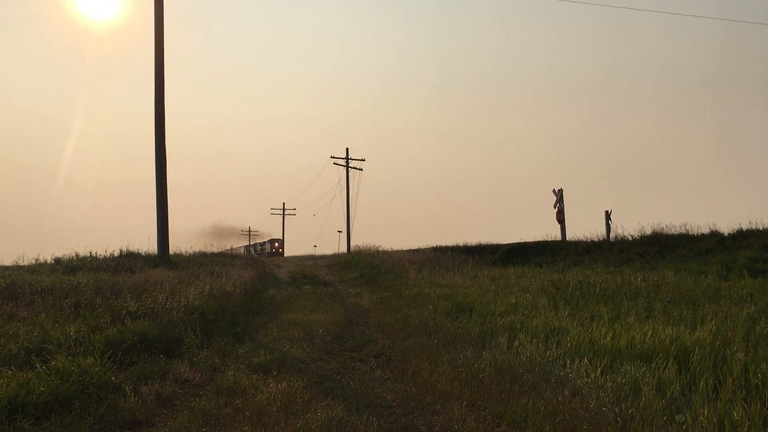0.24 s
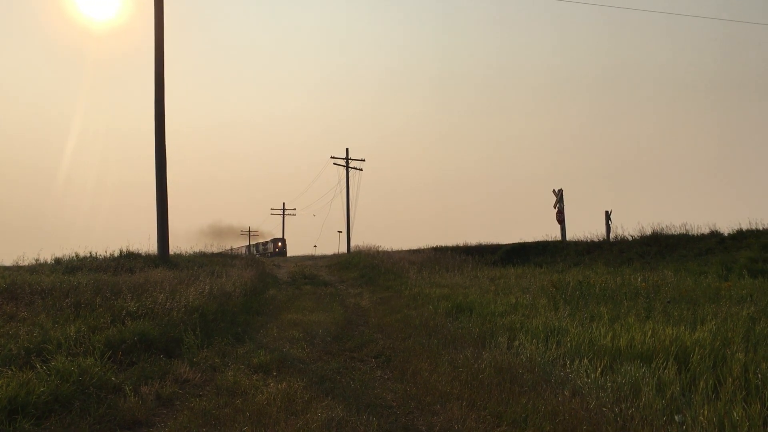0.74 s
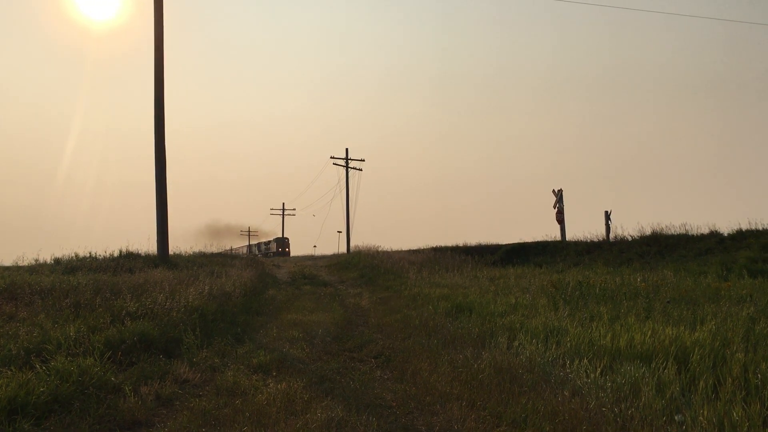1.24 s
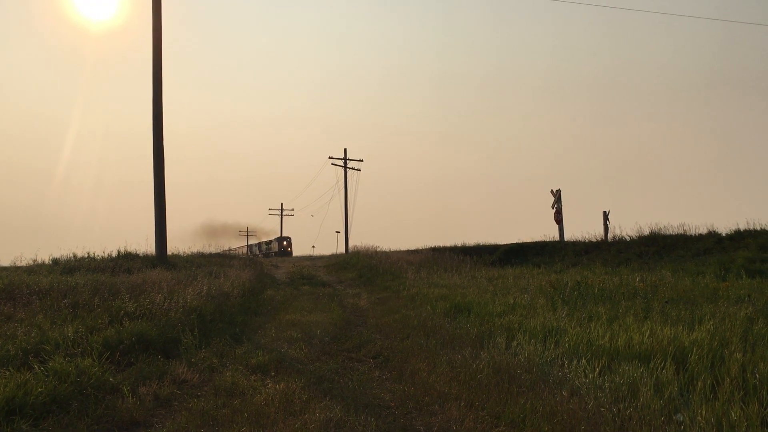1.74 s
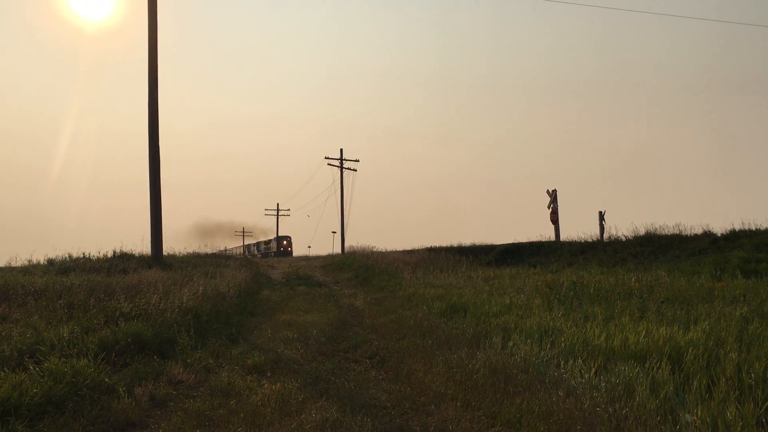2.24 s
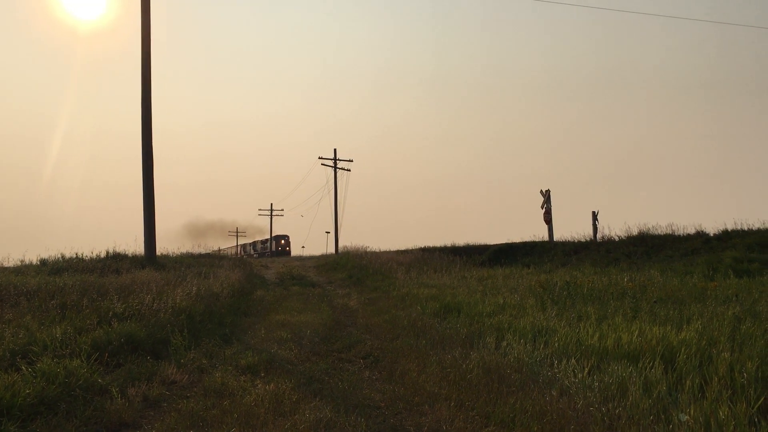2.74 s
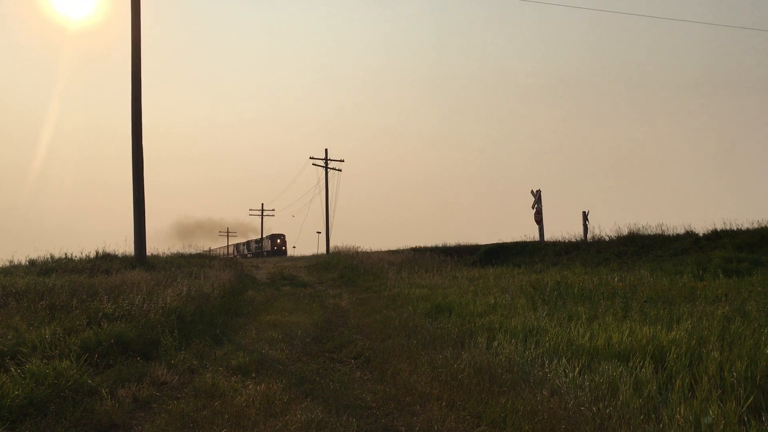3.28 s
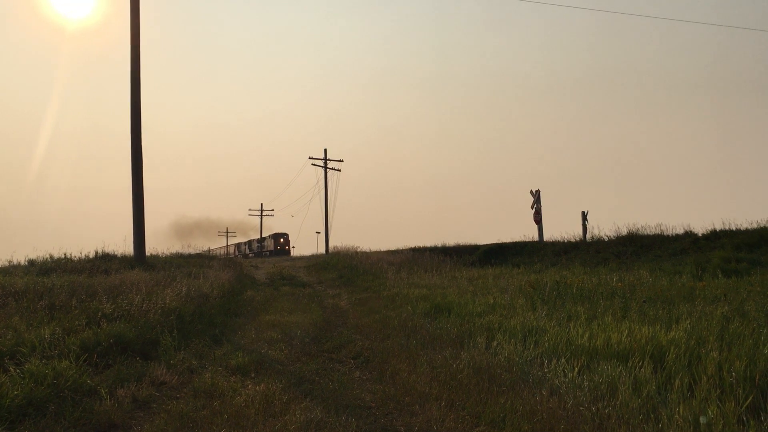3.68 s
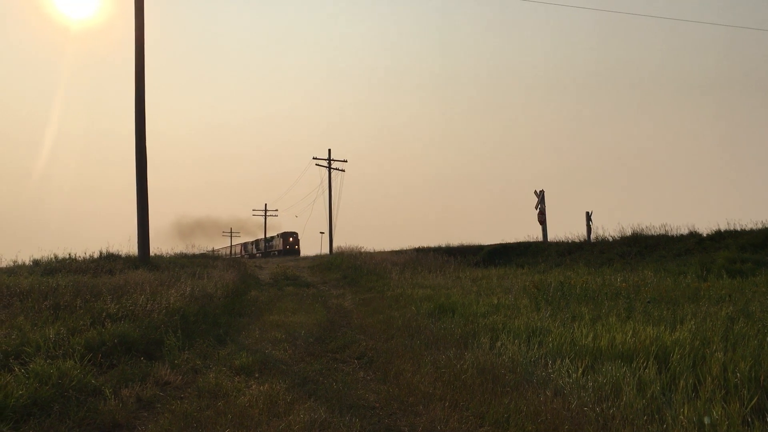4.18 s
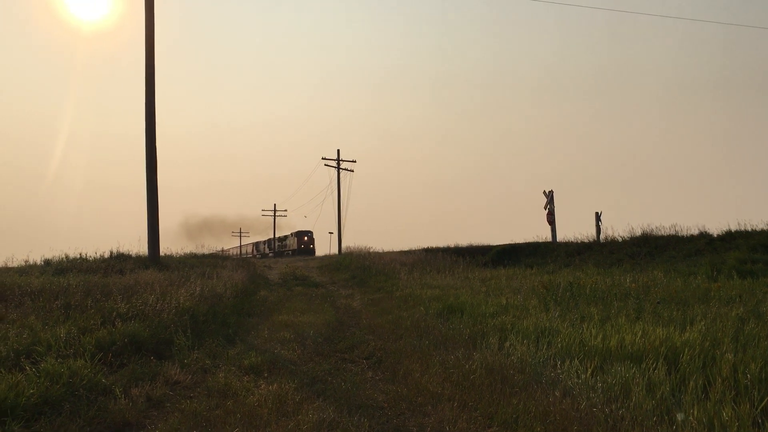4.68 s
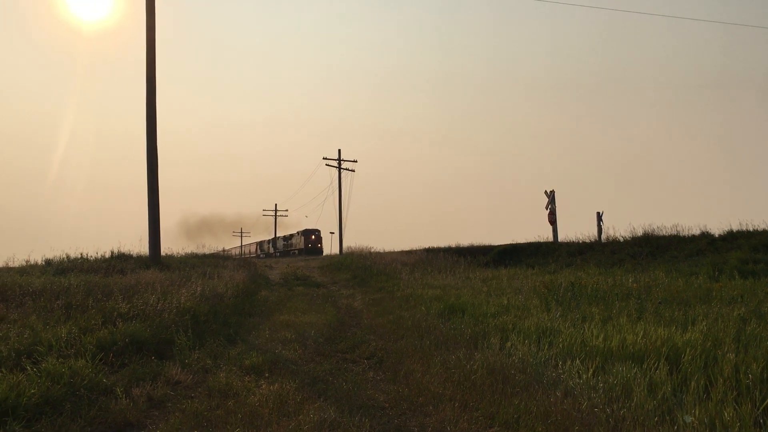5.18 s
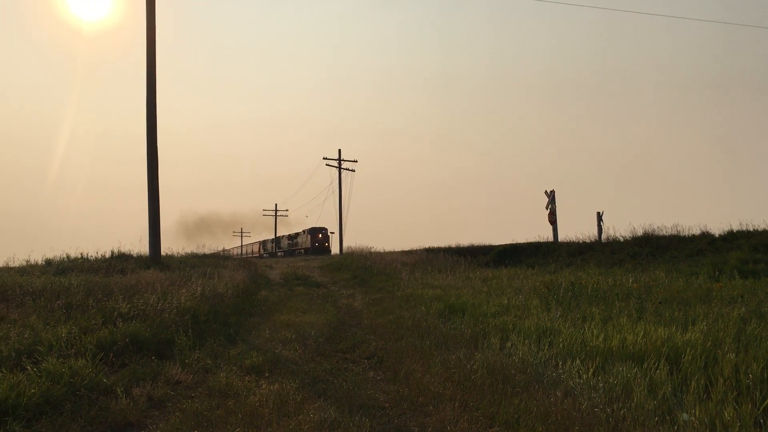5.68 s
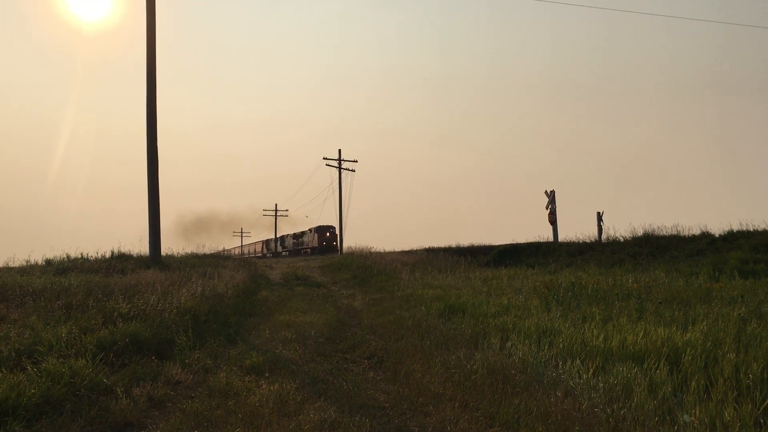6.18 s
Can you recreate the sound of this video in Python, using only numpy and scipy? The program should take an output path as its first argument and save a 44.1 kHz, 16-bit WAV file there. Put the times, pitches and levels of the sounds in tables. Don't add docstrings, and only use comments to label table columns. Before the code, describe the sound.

Low pulsing diesel engine and wheel rumble slowly grow over faint insect buzzing and a close tick, before one short chordal train horn blast fades away.

```python
import sys
import numpy as np
from scipy import signal
from scipy.fft import rfft, irfft
from scipy.io import wavfile
from scipy.ndimage import uniform_filter1d

SR = 44100
rng = np.random.default_rng(int(sys.argv[2]) if len(sys.argv) > 2 else 0)


def pcm_store(signal):
    levels = np.round(np.clip(np.atleast_2d(signal), -1, 1) * 32767)
    wavfile.write(sys.argv[1], SR, levels.astype(np.int16).T)


def voltage_ratio(decibels):
    exponent = np.asarray(decibels, float) / 20
    return 10 ** exponent


N = 283122

# start_s, cycles_per_s / start_s, nearness_db
CRANK_SPEED = [(0.0, 9.0099), (1.5, 9.0147), (3.0, 9.0058), (4.0, 9.0095), (5.0, 9.0385), (5.7, 9.0421),
               (6.42, 9.0165)]
NEARNESS = [(0, 1), (.7, 1.5), (1.4, 2), (2.0, 4.5), (2.7, 6), (3.5, 8), (4.2, 8), (5.0, 9.5), (5.7, 13),
            (6.42, 14.5)]


def train():
    turns, near_db = np.cumsum(in_time(CRANK_SPEED)) / SR, in_time(NEARNESS)
    return throb(turns, near_db) + rumble(turns, near_db) + clatter(turns, near_db) + hiss(turns, near_db)


# multiple of the crank cycle rate, level_db (rms)
EXHAUST_TONES = [(5, -51.8), (6, -52.7), (7, -53.3), (8, -38.6), (9, -46.5), (10, -53.9), (11, -38.5),
                 (12, -40.8), (13, -43.4), (14, -54.6), (15, -54.1), (16, -54.5), (17, -52.0), (18, -61.3),
                 (19, -54.1), (20, -52.8), (21, -57.9), (22, -53.9), (23, -54.5), (24, -58.8), (25, -56.7),
                 (26, -53.6), (27, -59.3), (28, -52.2), (29, -51.1), (30, -55.0), (31, -63.2), (33, -60.0),
                 (34, -52.6), (35, -61.6)]
# place in the cycle (0-1), strength_db
FIRINGS = [(0.021, -9.9), (0.075, -14.2), (0.119, -5.3), (0.199, -14.0), (0.258, -15.4), (0.34, -13.8),
           (0.421, -3.9), (0.496, -5.2), (0.513, -10.8), (0.585, -4.8), (0.609, -6.4), (0.652, -15.9),
           (0.772, -1.3), (0.818, -12.2), (0.85, -7.0), (0.999, -9.2)]


def throb(turns, near_db):
    out = 0
    place, strength_db = np.transpose(FIRINGS)
    gain_db, bright_db = -1.1 + 0.17 * near_db, -2.83 + 0.61 * near_db
    for k, db in EXHAUST_TONES:
        lines_up = np.angle(np.sum(voltage_ratio(strength_db) * np.exp(-2j * np.pi * k * place)))
        upper = np.clip((k - 12.0) / 24.2, 0, 1)
        unsteady_db = (1.0 + 1.26 * upper) * drift(1.93)
        level = voltage_ratio(db + gain_db + upper * bright_db + unsteady_db)
        wander = 0.15 * upper * drift(2.3)
        out = out - np.sqrt(2) * level * np.cos(2 * np.pi * round(k) * turns + lines_up + wander)
    return out


# pitch_hz, level_db (per Hz)
RUMBLE_SPECTRUM = [(30, -24), (42, -3), (60, -5), (100, -4), (150, -3), (220, -3), (300, -5), (350, -14),
                   (420, -24), (550, -50)]


def rumble(turns, near_db):
    level = voltage_ratio(-50 + 0.96 * near_db)
    return level * puffs(turns + 0.1, depth_db=2.08) * coloured(RUMBLE_SPECTRUM)


# pitch_hz, level_db (per Hz)
CLATTER_SPECTRUM = [(190, -41), (330, 0.5), (414, -3.5), (464, -11.5), (612, -7.5), (752, -20), (950, -21),
                    (1530, -19.5), (1800, -26), (2340, -18), (3960, -120)]


def clatter(turns, near_db):
    level = voltage_ratio(-61.5 + 0.98 * near_db)
    return level * puffs(turns + 0.358, depth_db=0.73) * coloured(CLATTER_SPECTRUM)


# pitch_hz, level_db (per Hz)
HISS_SPECTRUM = [(900, -21), (1200, -35), (1530, -5.5), (1750, -8.5), (2050, 1), (2350, -6), (2800, -4),
                 (3300, -2.5), (3620, 1), (3950, -3.5), (6500, -5), (8200, -14), (9800, -18.5),
                 (11500, -30), (14000, -54)]
# middle_s, half_length_s, level_db
HISS_SWELLS = [
    (0.27, .04, 4.5),
    (3.52, 0.34, 4),
    (2.94, 0.62, 2),
    (4.17, 0.2, 4),
    (5.15, 0.14, -8),
]


def hiss(turns, near_db):
    t = np.arange(N) / SR
    swells_db = sum(db * np.exp(-((t - s) / half) ** 2) for s, half, db in HISS_SWELLS)
    level = voltage_ratio(-68 + 1.075 * near_db + swells_db)
    return level * puffs(turns, depth_db=0.92) * coloured(HISS_SPECTRUM)


def puffs(turns, depth_db):
    beats = 4 * turns
    size = rng.uniform(0.1, 1.9, 300)[beats.astype(int)]
    sudden = uniform_filter1d(size * np.exp(-2.5 * (beats % 1)), size=150)
    swell = np.cos(2 * np.pi * (turns - 0.3))
    return voltage_ratio(depth_db * (swell + 3.9 * (sudden - 0.5049)))


OPEN_S, CLOSE_S = 4.322, 5.176
# pitch_hz, level_db (at valve close), late_s, drain_loss_db, pitch_sag (share)
BELLS = [
    (324.6, -28.2, 0.0011, 16.5, .013),
    (380, -36, 0.0076, 21, .0045),
    (493.6, -36, 0.023, 46, 0.0014),
]
# multiple of its pitch, level_db
LOW_PARTIALS = [(1, 0.0), (2, -3.6), (3, -15.0), (4, -19.6), (5, -22.5), (6, -25.4), (7, -27.0), (8, -32.4),
                (9, -30.5), (10, -36.4), (11, -36.5), (12, -40.1), (13, -40.1), (14, -40.2), (15, -43.4),
                (16, -45.7), (17, -44.8), (18, -46.3), (19, -48.8), (20, -46.8), (21, -46.9), (22, -53.7)]
MID_PARTIALS = [(1, 0.0), (2, -0.5), (3, -13.5), (4, -12.5), (5, -20.5), (6, -19.5), (7, -29.0), (8, -30.0),
                (9, -34.0), (10, -31.4), (11, -33.4), (12, -34.3), (13, -40.3), (14, -40.6), (15, -38.1),
                (16, -40.1), (17, -39.4), (18, -42.3)]
TOP_PARTIALS = [(1, 0.0), (2, -15.0), (3, -19.5), (4, -19.9), (5, -21.5), (6, -27.5), (7, -33.9),
                (8, -31.8), (9, -35.3), (10, -36.4), (11, -38.7), (12, -43.2)]
# pitch_hz, level_db (per Hz)
RUSH_SPECTRUM = [(700, -6), (1100, -1.5), (1500, 2.5), (2500, -4.5), (4000, -8), (6000, -13), (8000, -17.5),
                 (10000, -26.5), (13000, -46)]


def horn():
    tables = (LOW_PARTIALS, MID_PARTIALS, TOP_PARTIALS)
    chord = sum(bell(row, partials) for row, partials in zip(BELLS, tables))
    squared = chord ** 2
    chord = chord + 0.15 * (squared - uniform_filter1d(squared, size=400))
    rush = blown(-46.5, late_s=0, rise_s=0.082, drain_db=40) * coloured(RUSH_SPECTRUM)
    return chord + near_echoes(chord) + far_echo(chord) + rush


def bell(row, partials):
    pitch_hz, db, late_s, drain_db, sag = row
    out = np.zeros(N)
    blast = slice(round(4.25 * SR), round(5.7 * SR))
    t = np.arange(N)[blast] / SR
    since_s, closing_s = np.clip(t - OPEN_S, 0, None), np.clip(t - CLOSE_S + 0.08, 0, None)
    sharp = 0.017 * np.exp(-since_s / 0.13)
    sagging = sag * np.minimum(closing_s / 0.22, 1)
    phase = 2 * np.pi * np.cumsum(pitch_hz * (1 + sharp - sagging)) / SR
    start_db, end_db = -11.5 * np.exp(-since_s / 0.078), -22.5 * closing_s
    for k, partial_db in partials:
        high = np.clip(k * pitch_hz / 1800, 0, 1.6)
        shimmer = min(high, 1) ** 1.5
        fading = 1 + 0.06 * high ** 2 + 0.5 * shimmer * drift(10, size=len(phase))
        hold = 0.33 if high > 1 else 1
        dull_db = start_db * high ** 2 + end_db * min(np.log2(k), 1.4) * hold
        smear = 0.5 * shimmer * drift(14, size=len(phase))
        wave = np.sin(round(k) * phase + 2 * np.pi * rng.random() + smear)
        out[blast] += voltage_ratio(partial_db + dull_db) * fading * wave
    rise_s = 0.016 + 0.7 * late_s
    return np.sqrt(2) * blown(db, late_s, rise_s, drain_db) * out


def blown(db, late_s, rise_s, drain_db):
    t = np.arange(N) / SR
    rise = (1 - np.exp(-np.clip(t - OPEN_S - late_s, 0, None) / rise_s)) ** 2
    swell_db = 3 * np.minimum(t - CLOSE_S, 0)
    drained = np.clip((t - CLOSE_S) / 0.34, 0, None) ** 2.63
    return rise * voltage_ratio(db + swell_db - drain_db * drained)


# delay_s, level_db
ECHOES = [
    (.05, -19),
    (.09, -20),
    (.14, -22),
]


def near_echoes(chord):
    dull = bandpass(chord, 600, 1500)
    return sum(voltage_ratio(db) * np.roll(dull, round(s * SR)) for s, db in ECHOES)


def far_echo(chord):
    middle, t = 4.9 * SR, np.arange(2 * SR) / SR
    flatter = np.interp(middle + (np.arange(N) - middle) * 0.984, np.arange(N), chord)
    decay = voltage_ratio(-60 * t / 20.0)
    land = rng.standard_normal(len(t)) * np.clip(t / 1.2, 0, 1) ** 1.3 * decay
    ridge = voltage_ratio(-3) * (np.arange(len(t)) == round(1.22 * SR))
    land = land / np.sqrt(np.sum(land ** 2)) + ridge
    thin = bandpass(flatter, 730, 1400)
    return voltage_ratio(-21) * signal.fftconvolve(thin, land)[:N]


# start_s, level_db (peak), pitch_hz (ring), crack_db
TICKS = [
    (2.1055, -37, 1800, 6),
    (2.1185, -46, 2200, 4),
    (2.946, -57, 9500, -10),
]


def ticks():
    out, t = np.zeros(N), np.arange(1500) / SR
    for s, db, hz, crack_db in TICKS:
        crack, buzz = rng.standard_normal((2, len(t)))
        ring = rms_one(bandpass(buzz, hz / 1.6, hz * 1.6)) * np.exp(-t / 0.005)
        crack = voltage_ratio(crack_db) * bandpass(crack, 3000, 15500) * np.exp(-t / 0.0011)
        out[round(s * SR):][:len(t)] += 0.65 * voltage_ratio(db) * (crack + ring)
    return out


# strokes_per_s, first_stroke (place 0-1), level_db (at rest)
SINGERS = [
    (19.7, .75, -86),
    (23.2, .3, -83),
    (0, -.065, -81),
]
# singer (row above), start_s, end_s, level_db
BOUTS = [(0, 0, .8, -82), (0, .85, 2.2, -75), (1, 0, .75, -80), (1, 2.2, 3.1, -78), (1, 3.5, 6.5, -83),
         (2, 0, .75, -74), (2, .75, 2.2, -81), (2, 3.15, 3.4, -76), (2, 4.5, 6.5, -76)]
# pitch_hz, level_db (per Hz)
CHIRR_SPECTRUM = [(5290, -45), (9000, -42), (10100, 0.5), (10500, 2.5), (11600, 10), (15000, 5), (15800, 4)]


def grasshoppers():
    t, power = np.arange(N) / SR, 0
    for who, (strokes_hz, first, rest_db) in enumerate(SINGERS):
        bouts = sum(voltage_ratio(db) ** 2 * (t >= on) * (t < off) for singer, on, off, db in BOUTS if singer == who)
        stroke = 1.1 * np.clip(0.5 + np.cos(2 * np.pi * (strokes_hz * t - first)), 0, 1)
        power = power + stroke ** 2 * (voltage_ratio(rest_db) ** 2 + uniform_filter1d(bouts, size=9000))
    return np.sqrt(power) * voltage_ratio(2.0) * coloured(CHIRR_SPECTRUM, flicker_db=0.5)


def coloured(spectrum, flicker_db=1.2):
    hz = np.arange(N // 2 + 1) * SR / N + 1e-9
    knots, db = np.transpose(spectrum)
    level = voltage_ratio(np.interp(np.log(hz), np.log(knots), db, -120, -120))
    shape = rfft(rng.standard_normal(N)) * level
    out, together = 0, drift(15)
    for centre in np.arange(np.log2(knots[0]), np.log2(knots[-1]) + 0.5, 0.5):
        band = irfft(shape * np.clip(1 - 2 * abs(np.log2(hz) - centre), 0, 1), N)
        out = out + band * voltage_ratio(flicker_db * (0.4 * together + drift(20)))
    return rms_one(out)


def drift(rate_hz, size=N):
    r = np.exp(-80 * np.pi * rate_hz / SR)
    slow = signal.lfilter([1], [1, -2 * r, r * r], rng.standard_normal(size // 40 + 2002))[2000:]
    return np.interp(np.arange(size) / 40, np.arange(len(slow)), rms_one(slow - slow.mean()))


def bandpass(x, low_hz, high_hz):
    return signal.sosfilt(signal.butter(2, [low_hz, high_hz], "band", fs=SR, output="sos"), x)


def rms_one(x):
    return x / np.sqrt(np.mean(x ** 2) + 1e-20)


def in_time(rows):
    s, value = np.transpose(rows)
    return np.interp(np.arange(N) / SR, s, value)


def scene():
    return (train() + horn() + ticks() + grasshoppers())[None]


def low_pass(x):
    return signal.sosfilt(signal.butter(12, 15920, fs=SR, output="sos"), x)


def record(dry):
    bass_cut = signal.butter(4, 34, "high", fs=SR, output="sos")
    mix = signal.sosfiltfilt(bass_cut, dry, padtype="even", padlen=4000)
    return low_pass(mix)


dry = scene()
out = record(dry)
pcm_store(out)
```